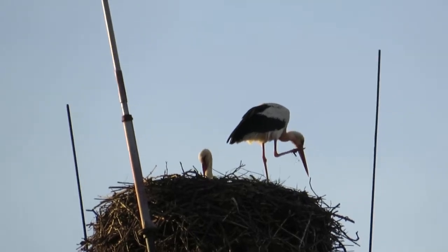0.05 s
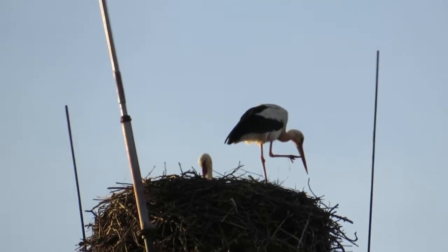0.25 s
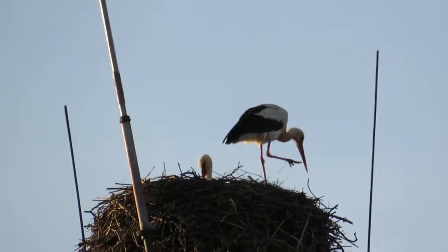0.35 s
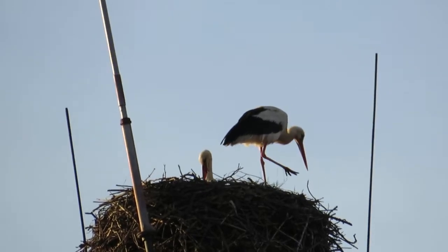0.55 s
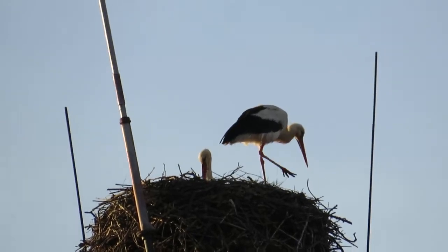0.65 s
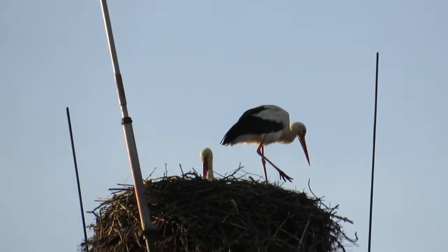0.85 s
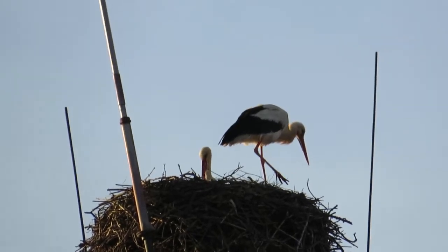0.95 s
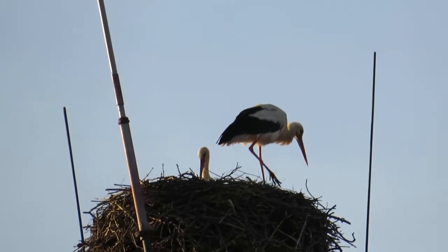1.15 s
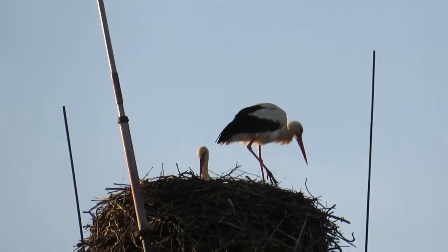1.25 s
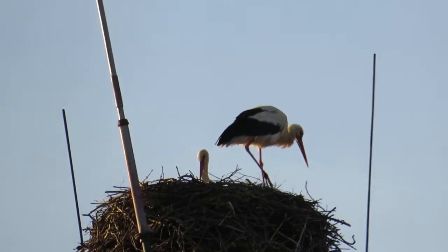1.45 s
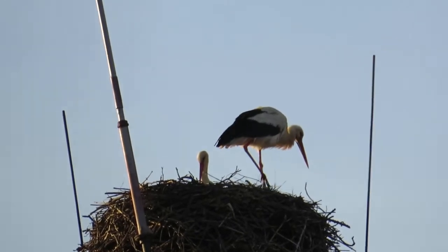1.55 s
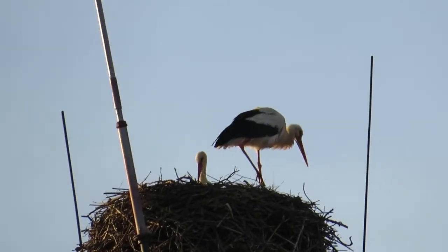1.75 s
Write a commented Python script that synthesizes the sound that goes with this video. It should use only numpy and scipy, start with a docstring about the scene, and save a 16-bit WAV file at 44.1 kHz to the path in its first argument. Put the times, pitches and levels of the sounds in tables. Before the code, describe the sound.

A bird whistles two falling, finely trilled notes at about 0.2 and 0.6 seconds, each ringing on in an outdoor echo. Small birds chirp thinly throughout and a distant flock twitters, over a soft faraway rush and fine hiss. From about 1.1 seconds a light wind rumbles faintly on the microphone, and near 1.5 seconds comes one dry clack, like a bill or stick.

```python
"""Outdoors, a quiet place below a stork's nest. A bird whistles falling, finely trilled notes that
ring on between buildings and trees. Small birds chirp thinly further off, a distant flock twitters,
and something clacks once. Under it lie a soft distant rush, fine hiss and a late breath of wind.
Calls are pitch-swept sines, the clack is damped modes, echoes are convolution with decaying noise."""
import sys
import numpy as np
from scipy import signal
from scipy.fft import rfft, irfft, next_fast_len
from scipy.io import wavfile

SR = 44100
rng = np.random.default_rng(int(sys.argv[2]) if len(sys.argv) > 2 else 0)


def persist_wave(psi):
    """Save psi, clipped to +-1, as 16-bit WAV."""
    counts = np.round(np.clip(psi, -1, 1) * 32767).astype(np.int16)
    wavfile.write(sys.argv[1], SR, np.atleast_2d(counts).T)


N = 79380

# main bird; first note heard only as echo: (start [s], length [s], level [dB], initial trill rate [Hz])
WHISTLE_NOTES = [(-.43, .235, -36.5, 61.3), (.190, 0.24, -37.5, 60), (0.643, 0.24, -36.5, 61.2)]
# distant rush: (frequency [Hz], relative density [dB])
RUSH_SPECTRUM = [(15, -47), (25, -34.5), (291, -0.5), (540, -2.5), (663, -3.5), (728, 2), (831, 1.5),
                 (912, -1.5), (983, -1.5), (1190, -6.5), (1600, -7.5), (2000, -9.5), (2200, -9.5),
                 (2860, -76), (4840, -120)]
# fine hiss: (frequency [Hz], relative density [dB])
HISS_SPECTRUM = [(1500, -15), (2300, 1.5), (3200, 2.5), (4500, -2.5), (6500, -5), (8000, -9), (9500, -12.5),
                 (12000, -17), (15500, -24)]
# stereo width of rush and hiss: (frequency [Hz], side minus mid [dB])
BACKGROUND_WIDTH = [(30, -28), (300, -42.5), (750, -35), (1500, -9.5), (2800, -9), (5000, -8), (7500, -4),
                    (10000, -10), (15000, -24)]
# small birds: (start [s], length [s], first [Hz], middle [Hz], last [Hz], level [dB], buzz depth [Hz])
CHIRP_NOTES = [(0.025, 0.024, 8350, 7250, 6000, -53.5, 150), (0.041, 0.079, 6640, 6400, 6270, -61, 300),
               (0.042, 0.11, 7750, 7650, 7560, -58.5, 536), (0.143, 0.084, 7290, 7060, 7260, -57, 129),
               (0.216, 0.051, 7400, 7460, 7350, -57, 332), (.674, 0.022, 7470, 7250, 6740, -56, 59.7),
               (0.685, 0.12, 8380, 7780, 7350, -59.5, 90), (0.701, 0.072, 7350, 7350, 5700, -57, 170),
               (1.360, 0.021, 5250, 5600, 5600, -54, 445), (1.504, .140, 7420, 7520, 7450, -57, 610)]
# far birds: (start [s], length [s], first [Hz], last [Hz], source level [dB])
FAR_BIRD_NOTES = [(.23, .41, 1500, 1425, -66.5), (.365, 0.046, 838, 795, -57.5),
                  (0.749, 0.14, 4900, 4780, -69.5), (.92, 0.053, 835, 820, -55),
                  (1.002, 0.097, 6430, 6350, -72), (1.07, 0.087, 829.6, 821.6, -57.5),
                  (1.212, .10, 6340, 6340, -69.5), (1.395, 0.075, 6340, 6290, -63),
                  (1.619, 0.068, 6300, 6280, -64)]
# closer bird: (start [s], length [s], level [dB])
TSIP_NOTES = [(1.095, .042, -57.5), (1.361, .044, -57)]
# wind envelope: (time [s], level [dB])
WIND_LEVEL = [(0, -81), (1.05, -84), (1.17, -67.5), (1.45, -67), (1.8, -65.5)]
# wind rumble: (frequency [Hz], relative density [dB])
WIND_SPECTRUM = [(25, -28), (60, -3.5), (110, -1.5), (220, -1.5), (500, -8), (1200, -22), (3000, -54)]
# stereo width of wind: (frequency [Hz], side minus mid [dB])
WIND_WIDTH = [(100, -44), (600, -4)]
# clack resonances: (frequency [Hz], relative level [dB], T60 [s])
KNOCK_MODES = [(710, -2, 0.038), (850, -0.5, 0.017), (1184, 2.5, 0.018), (1780, -4.5, 0.019),
               (2090, -5, 0.022), (2560, -12, 0.026), (5500, -3, 0.0085), (6900, -17, .005)]

LEAD_S = 1  # lead-in for notes before time 0
NEAR_T60_S = 0.1  # close roofs and walls


def from_db(db):
    """Decibels to gain."""
    return 10 ** (np.asarray(db) / 20)


def unit_rms(x):
    """Scale to rms 1."""
    return x / np.sqrt(np.mean(x ** 2) + 1e-20)


def at_hz(points, hz):
    """Interpolate over log frequency."""
    knots_hz, values = np.transpose(points)
    return np.interp(np.log(np.maximum(hz, 1)), np.log(knots_hz), values)


def drift(count, rate_hz):
    """Random wander, spread about 1."""
    return np.interp(np.arange(count) / SR * rate_hz, np.arange(1024), rng.standard_normal(1024))


def gate(t, length_s, attack_s, release_s):
    """Smooth attack, hold, release."""
    ramp = np.minimum(t / attack_s, (length_s - t) / release_s)
    return np.sin(np.pi / 2 * np.clip(ramp, 0, 1))


def tone(hz):
    """Sine on a pitch curve, rms 1."""
    return np.sqrt(2) * np.sin(2 * np.pi * np.cumsum(hz) / SR)


def track(notes):
    """Sum (start [s], samples) notes on a track that begins LEAD_S early."""
    out = np.zeros(N + 2 * LEAD_S * SR)
    for start_s, note in notes:
        i = int((start_s + LEAD_S) * SR)
        out[i:i + len(note)] += note
    return out[:N + LEAD_S * SR]


def scatter(x, t60_s, coherence=1.0):
    """Dense, decaying outdoor reflections; coherence 1 is mono."""
    t = np.arange(SR) / SR
    mid, side = rng.standard_normal((2, SR)) * from_db(-60 * t / t60_s) * np.minimum(t / 0.0073, 1)
    response = np.sqrt(1 + coherence) * mid + np.sqrt(1 - coherence) * side * [[1], [-1]]
    return signal.fftconvolve(x[None], unit_rms(response) / np.sqrt(SR), axes=1)[:, :len(x)]


def place(x, pan_db, lag_ms):
    """Left channel louder by pan_db, later by lag_ms; drops the lead-in."""
    count, sides = x.shape[1], np.array([[.5], [-.5]])
    size = next_fast_len(count + 64)
    delay = np.exp(-2j * np.pi * np.fft.rfftfreq(size, 1 / SR) * sides * lag_ms / 1000)
    delayed = irfft(rfft(x, size) * delay, size)
    return from_db(pan_db * sides) * delayed[:, count - N:count]


def noise(spectrum, width):
    """Steady shaped stereo noise, rms 1."""
    hz = np.fft.rfftfreq(N, 1 / SR)
    mid, side = rfft(rng.standard_normal((2, N))) * from_db(at_hz(spectrum, hz))
    side_gain = from_db(at_hz(width, hz))
    stereo = (mid + side_gain * side * [[1], [-1]]) / np.hypot(1, side_gain)
    return unit_rms(irfft(stereo, N))


def whistle(length_s, db, trill_rate_hz):
    """Scoops up, then sinks and swells under a quickening, narrowing trill."""
    top_hz, end_hz, fall_s = 4073, 2601, .055
    scoop_hz, scoop_s = 1501, .00503
    trill_depth_hz, narrow_s, rise_hz_per_s = 266.4, .3, 68.7
    swell_db, swell_s = 13, .02
    throat_hz, loss_db_per_khz = 3540, 25  # weaker above the throat's range
    t = np.arange(int(length_s * SR)) / SR
    cycles = np.maximum(trill_rate_hz * t + rise_hz_per_s * t * t / 2, 1)
    trill_hz = trill_depth_hz * np.exp(-t / narrow_s) * np.cos(2 * np.pi * cycles)
    glide_hz = end_hz + (top_hz - end_hz) * np.exp(-t / fall_s) - scoop_hz * np.exp(-t / scoop_s)
    hz = glide_hz + trill_hz + 12 * drift(len(t), 304)
    loss_db = loss_db_per_khz * np.maximum(hz - throat_hz, 0) / 1000
    gain = from_db(db - loss_db - swell_db * np.exp(-t / swell_s))
    return gain * gate(t, length_s, attack_s=.002, release_s=.012) * tone(hz)


def whistler():
    """Main bird with wall and yard echoes; far echoes keep only each note's held end."""
    direct = track([(start_s, whistle(*row)) for start_s, *row in WHISTLE_NOTES])
    walls = from_db(-11.5) * scatter(direct, NEAR_T60_S)
    yard = from_db(-9) * scatter(direct, t60_s=.7)
    held_band = signal.butter(3, [2517, 2721], "band", fs=SR, output="sos")
    far = from_db(-6.5) * scatter(signal.sosfilt(held_band, direct), t60_s=1.39)
    return place(direct + walls + yard + far, pan_db=.8, lag_ms=.011)


def background():
    """Steady distant rush and fine hiss."""
    rush = from_db(-56) * noise(RUSH_SPECTRUM, BACKGROUND_WIDTH)
    hiss = from_db(-60) * noise(HISS_SPECTRUM, BACKGROUND_WIDTH)
    return rush + hiss


def flock(count=28, from_s=-.1, span_s=1.391, low_hz=3193, high_hz=4920):
    """Distant twitter: random falling chirps, heard only as echoes."""
    notes = []
    for when, pitch, strength in rng.random((count, 3)):
        hz = low_hz * (high_hz / low_hz) ** pitch
        note = chirp(.043, 1.1 * hz, hz, .88 * hz, db=-66.5 + 6 * strength, buzz_depth_hz=282)
        notes.append((from_s + when * span_s, note))
    return scatter(track(notes), t60_s=.23, coherence=.8)[:, -N:]


def chirp(length_s, first_hz, middle_hz, last_hz, db, buzz_depth_hz):
    """Thin parabolic glide with an uneven pitch buzz."""
    t = np.arange(int(length_s * SR)) / SR
    parabola = np.polyfit([0, .5, 1], [first_hz, middle_hz, last_hz], 2)
    buzz_rate_hz = 85 * (1 + .28 * drift(len(t), 99.9))
    buzz = np.sin(2 * np.pi * np.cumsum(buzz_rate_hz) / SR) + .36 * drift(len(t), 405.3)
    hz = np.polyval(parabola, t / length_s) + buzz_depth_hz * buzz
    return from_db(db) * gate(t, length_s, attack_s=.0069, release_s=.0069) * tone(hz)


def small_birds():
    """High chirps and tsips with echoes, slightly off centre."""
    chirps = track([(start_s, chirp(*row)) for start_s, *row in CHIRP_NOTES])
    tsips = track([(start_s, tsip(*row)) for start_s, *row in TSIP_NOTES])
    echoes = scatter(from_db(-2.5) * chirps + from_db(-6) * tsips, t60_s=.72, coherence=.42)
    return place(chirps + tsips + echoes, pan_db=1, lag_ms=.048)


def far_note(length_s, first_hz, last_hz, db):
    """Soft straight note, slightly wavering."""
    t = np.arange(int(length_s * SR)) / SR
    hz = np.linspace(first_hz, last_hz, len(t)) * (1 + .016 * drift(len(t), 249))
    return from_db(db) * gate(t, length_s, attack_s=.0099, release_s=.0099) * tone(hz)


def far_birds():
    """Distant notes blurred by echoes."""
    notes = track([(start_s, far_note(*row)) for start_s, *row in FAR_BIRD_NOTES])
    echoes = from_db(-4.5) * scatter(notes, t60_s=.63)
    return (from_db(-1) * notes + echoes)[:, -N:]


def tsip(length_s, db, foot_hz=4840, peak_hz=7810, end_hz=6060):
    """Quick pitch arch: raspy rise, partial fall."""
    t = np.arange(int(length_s * SR)) / SR
    from_peak = 2 * t / length_s - 1
    drop_hz = peak_hz - np.where(from_peak < 0, foot_hz, end_hz)
    arch_hz = peak_hz - drop_hz * np.abs(from_peak) ** 1.9
    rasp_hz = (120 + 900 * np.exp(-t / .012)) * drift(len(t), 2160)
    return from_db(db) * gate(t, length_s, attack_s=.0016, release_s=.0065) * tone(arch_hz + rasp_hz)


def wind():
    """Breath of wind on the microphone: a light rumble, rising late."""
    level_db = np.interp(np.arange(N) / SR, *np.transpose(WIND_LEVEL))
    return from_db(level_db) * noise(WIND_SPECTRUM, WIND_WIDTH)


def clack(start_s=1.4672, gain_db=-40.5, rebound_s=.0028, rebound_db=-12, highpass_hz=483):
    """Dry knock, as of a bill or stick: damped modes, one rebound."""
    t = np.arange(SR // 8) / SR
    ring = sum((-1) ** k * from_db(db - 60 * t / t60_s) * np.sin(2 * np.pi * hz * t)
               for k, (hz, db, t60_s) in enumerate(KNOCK_MODES))
    hits = track([(start_s, ring), (start_s + rebound_s, from_db(rebound_db) * ring)])
    highpass = signal.butter(2, highpass_hz, "high", fs=SR, output="sos")
    direct = from_db(gain_db) * signal.sosfilt(highpass, hits)
    walls = from_db(-16) * scatter(direct, NEAR_T60_S, coherence=.96)
    return place(direct + walls, pan_db=0, lag_ms=.046)


def scene():
    """Stereo sum of all sources."""
    return whistler() + background() + flock() + small_birds() + far_birds() + wind() + clack()


def record(dry):
    """Steep low-pass at 15.6 kHz."""
    return signal.sosfilt(signal.ellip(12, .1, 80, 15600, fs=SR, output="sos"), dry)


dry = scene()
out = record(dry)
persist_wave(out)
```